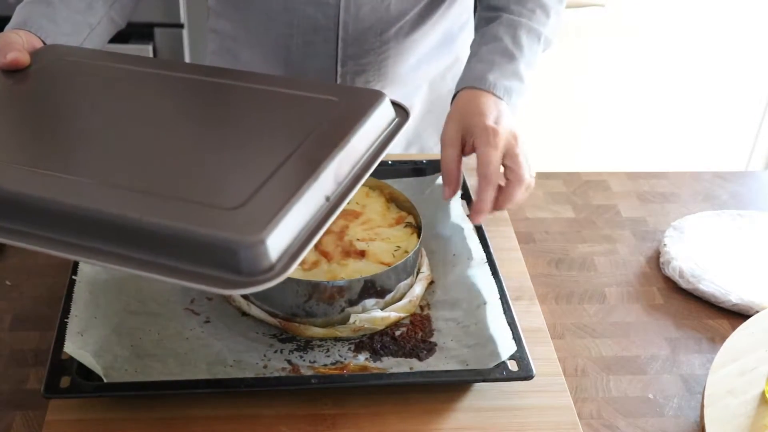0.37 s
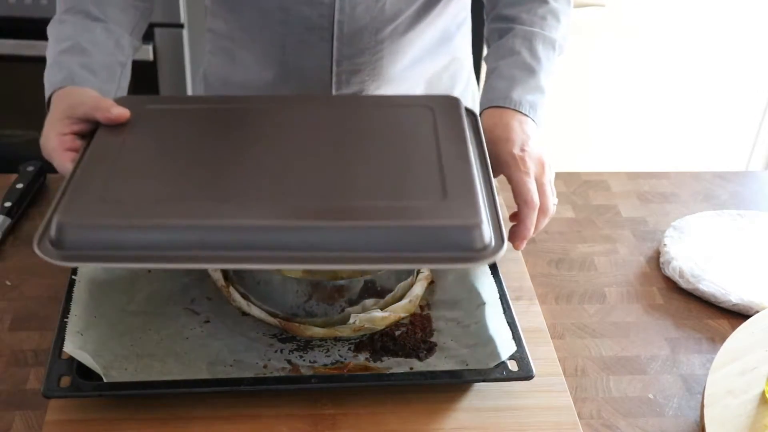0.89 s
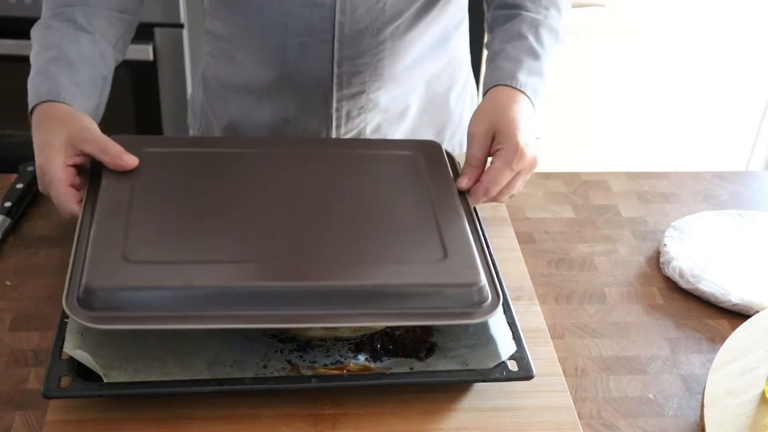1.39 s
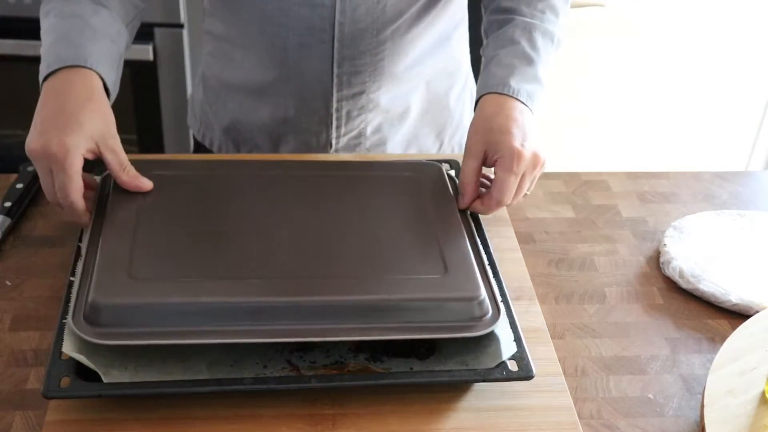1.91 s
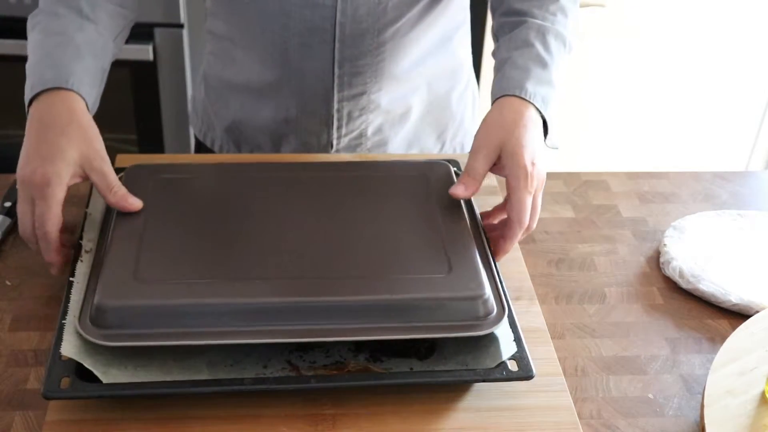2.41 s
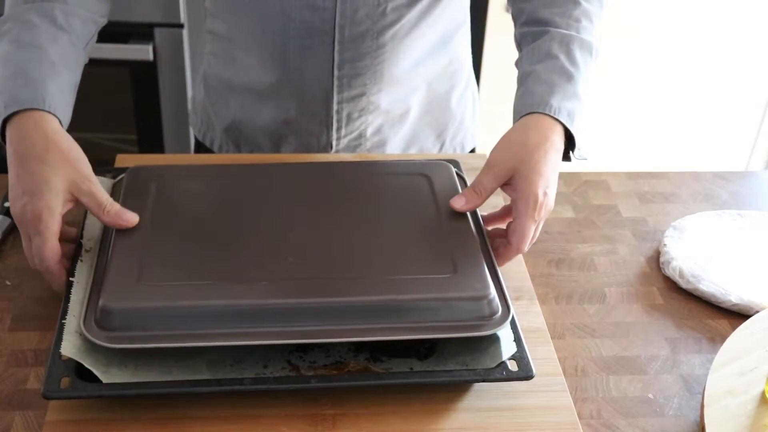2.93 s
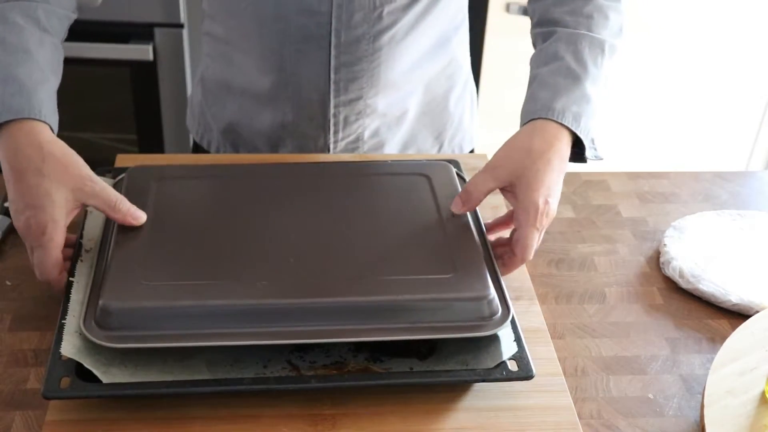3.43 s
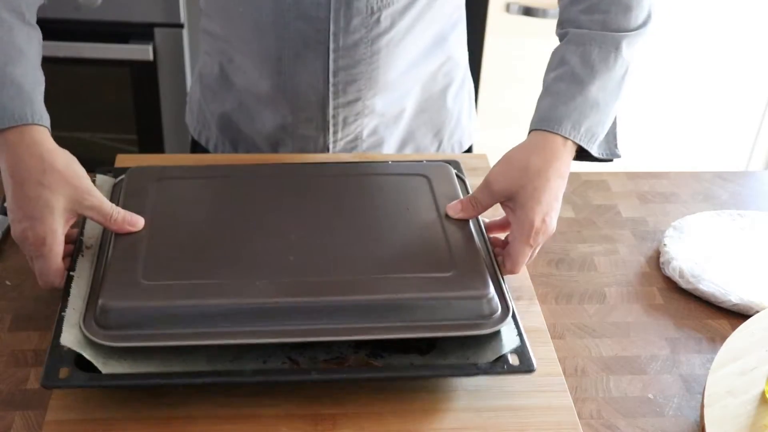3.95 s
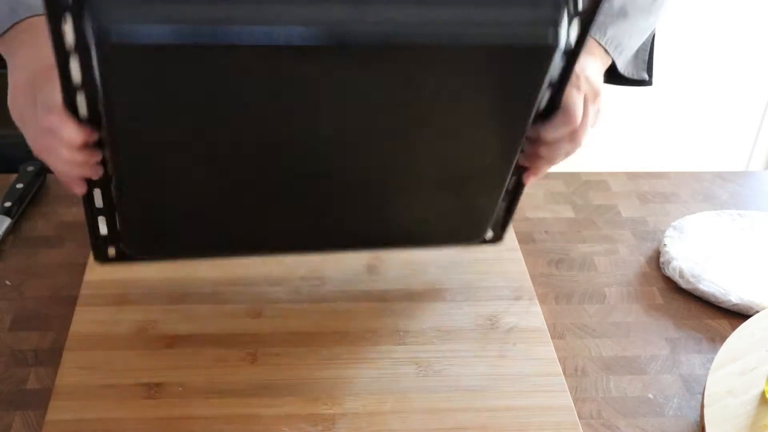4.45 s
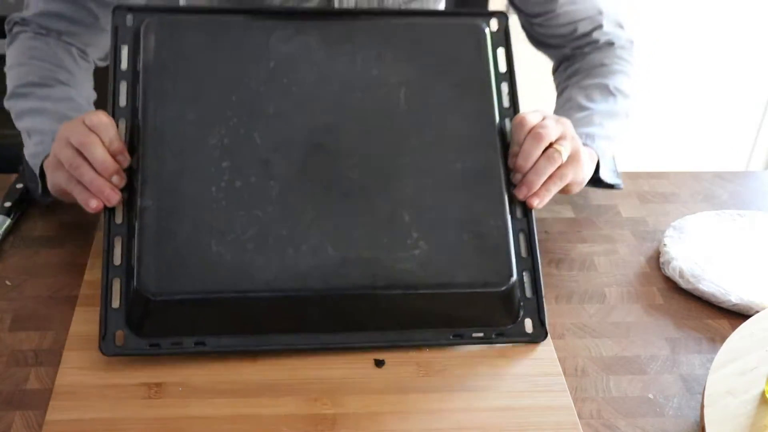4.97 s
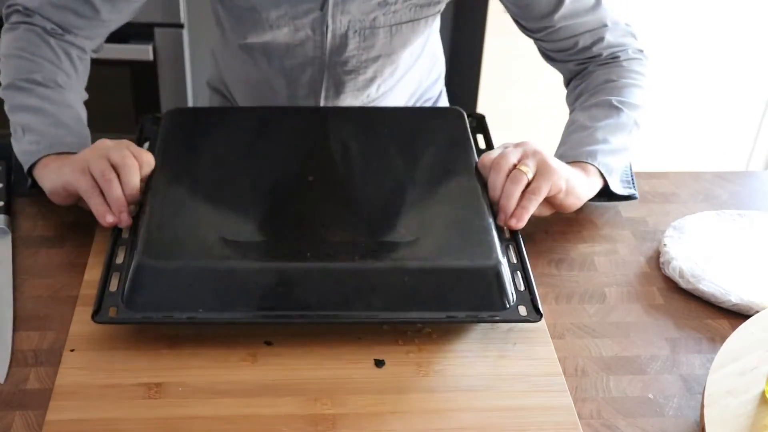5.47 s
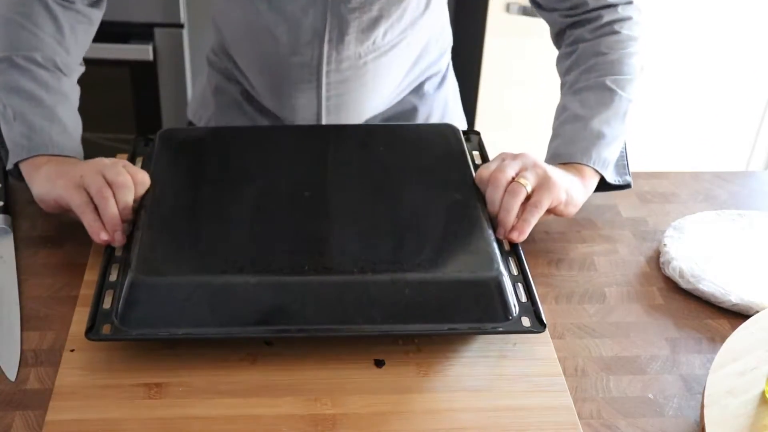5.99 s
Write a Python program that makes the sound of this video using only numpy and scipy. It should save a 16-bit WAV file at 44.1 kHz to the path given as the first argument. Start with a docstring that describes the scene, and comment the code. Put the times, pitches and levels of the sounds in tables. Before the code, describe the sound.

Parchment paper crackles, thin metal trays knock and scrape together, then a loud metallic bang lands on a wooden board with steel ring ticks.

```python
"""In a small kitchen, a cook lays a baking tray upside down over another, grips both, flips them
and sets them on a wooden board. Trays, steel cake ring and board sound as groups of dying sine tones;
knocks and ring ticks add shaped noise. Parchment snaps are short noise bursts; rubbing and rustling are
random tiny slips. Echoes made of fading noise, quiet air and a faint hiss surround it, nearly in mono."""
import sys
import numpy as np
from scipy import signal
from scipy.fft import rfft, irfft
from scipy.io import wavfile
from scipy.ndimage import uniform_filter1d

SR = 44100
rng = np.random.default_rng(int(sys.argv[2]) if len(sys.argv) > 2 else 0)


def pcm_store(signal):
    """Save signal as 16-bit PCM."""
    levels = np.round(np.clip(np.atleast_2d(signal), -1, 1) * 32767)
    wavfile.write(sys.argv[1], SR, levels.astype(np.int16).T)


def undo_db(level):
    """Turn decibels back into plain size, where 20 dB means ten times bigger."""
    steps = np.asarray(level, float) / 20
    return 10 ** steps


N = 269892
T = np.arange(N) / SR  # time in s

# tones of the thin upper tray: pitch_hz [Hz], level_db [dB], t60_s [s to fall 60 dB]
THIN_TRAY = [(297, 3, 0.43), (365.3, 5, 0.59), (490, 9, 0.46), (656.4, 7.5, 0.76), (741, -2, 1),
             (876, 6, 0.34), (1000, 0, 0.48), (1145, 12, 0.31), (1370, -3, 0.46), (1446, 16.5, 0.44),
             (1550, -5, 0.25), (1910, -28, .2), (2243, 16.5, 0.1), (2640, -13, .2), (3030, -6, 0.15),
             (3360, -2, 0.36)]
# tone colour of rustling paper, also used for the ring's ticks: pitch_hz [Hz], level_db [dB per Hz]
RUSTLE = [(880, -44.5), (1500, -4.5), (3410, -1.5), (3960, -4.5), (5490, -2.5), (7760, -10), (13800, -15.5),
          (16000, -16)]
STRIKE_TURNS = 0.08  # phase spread of struck tones, in turns: a blow starts them almost together


def fade(t, t60):
    """Exponential decay, 60 dB down after t60 seconds (never shorter than 2 ms)."""
    return np.exp(-np.log(1000) * t / np.maximum(t60, 0.002))


def level(x, db):
    """Scale to an rms level."""
    return x * undo_db(db) / np.sqrt(np.mean(x ** 2))


def shape(x, gain_db):
    """Causal filter whose dB gain is a function of frequency (minimum phase by the cepstrum)."""
    hz = np.maximum(np.fft.rfftfreq(2048, 1 / SR), 10)
    cepstrum = irfft(gain_db(hz) * np.log(10) / 20)
    # fold the backward half onto the forward half, so that nothing sounds early
    cepstrum[1:1024] *= 2
    cepstrum[1025:] = 0
    response = irfft(np.exp(rfft(cepstrum)))
    return signal.fftconvolve(x, response)[:len(x)]


def points(table):
    """Turn a (Hz, dB) table into a gain function."""
    hz, db = np.transpose(table)
    return lambda f: np.interp(np.log(f), np.log(hz), db)


def add(out, s, sound, peak_db):
    """Mix a sound in at time s with the given peak."""
    i = int(s * SR)
    scaled = sound * undo_db(peak_db) / np.abs(sound).max()
    out[i:i + len(sound)] += scaled[:N - i]


def ringing(modes, t, weight_db, detune, scatter_db, count=2, phase_turns=1):
    """Decaying sines in close, beating groups; each blow lands elsewhere, so strengths and phases change."""
    hz, db, t60 = np.repeat(np.transpose(modes), count, axis=1)[:, :, None]
    chance = rng.standard_normal((3, len(hz), 1))
    cycles = hz * (1 + detune * chance[0]) * t + phase_turns * chance[1]
    strength = undo_db(db + weight_db(hz) + scatter_db * chance[2])
    return (strength * np.sin(2 * np.pi * cycles) * fade(t, t60)).sum(axis=0)


def grit(rate, spread_db, patchy_db):
    """Slips of unequal size, the largest capped, coming in patches of about 25 ms; rms 1."""
    size_db = spread_db * np.minimum(rng.exponential(size=N), 4)
    sizes = undo_db(size_db) * rng.standard_normal(N)
    patches = np.repeat(rng.standard_normal(N // 1000 + 1), 1000)
    patches = uniform_filter1d(patches, 500)[:N]
    slipping = rng.random(N) < rate / SR  # rate is in slips per second
    return level(sizes * undo_db(patchy_db * patches) * slipping, 0)


def strokes(table, rise_db_s, fall_db_s):
    """Gain over time: each stroke swells, holds its level and dies away; powers add."""
    start, length, db = np.transpose(table)[:, :, None]
    t = T[::64]
    rise_db = rise_db_s * np.maximum(start - t, 0)
    fall_db = fall_db_s * np.maximum(t - start - length, 0)
    gain = undo_db(db - rise_db - fall_db)
    return np.interp(T, t, np.sqrt((gain ** 2).sum(axis=0)))


def knocks():
    """A short rattle of contacts drives the tray's modes and a dense clatter; each knock has its own brightness."""
    # tray knocks: start_s [s], peak_db [dB], centre_hz [Hz], treble_lift_db [dB],
    # rattle_s [s, scales how long the knock's parts last]
    knock_table = [(1.461, -49, 500, -12, 0.028), (1.688, -16.5, 806, 10, 0.029),
                   (1.739, -25.5, 764, -8, 0.034), (1.99, -33, 1100, -14, 0.012),
                   (2.088, -22.5, 795, -2.5, 0.048), (2.129, -35, 680, -9, 0.011),
                   (2.502, -45, 720, -1, 0.02), (2.614, -27.5, 850, -4, 0.029),
                   (3.075, -39, 820, -10, 0.019), (3.102, -29.5, 840, 5, 0.049),
                   (3.288, -44, 960, 6, 0.019), (3.471, -45, 1470, -18, 0.056),
                   (3.662, -41.5, 570, 4, 0.028), (3.712, -30.5, 880, 5, 0.033),
                   (3.872, -41.5, 890, -1, 0.046), (4.073, -20, 650, 5.5, 0.0092),
                   (4.086, -21, 397, 2.5, 0.013), (4.118, -28.5, 480, -28, 0.025),
                   (4.898, -36, 659, 23, 0.0077), (5.085, -13.5, 400, 9.5, 0.011),
                   (5.136, -26.5, 715, 8.5, 0.022), (5.23, -24, 475, -23, 0.022),
                   (5.26, -25, 1740, -22, 0.0075), (5.271, -3.5, 1650, -7.5, 0.0048),
                   (5.282, -12.5, 670, 1, 0.0072), (5.294, -11.5, 890, 1, 0.011),
                   (5.311, -17, 1070, -14, 0.025), (5.335, -20.5, 490, -16, 0.063),
                   (5.39, -27, 900, -20, 0.011), (5.42, -20, 674, -10, 0.026),
                   (5.454, -19.5, 1000, -8.5, 0.026), (5.48, -23, 530, -21, 0.017),
                   (5.53, -33, 700, -15, 0.01), (5.654, -28, 1500, -2.5, 0.013),
                   (6.079, -42, 490, 3, 0.014)]
    # tones of the heavy lower tray: pitch_hz [Hz], level_db [dB], t60_s [s]
    heavy_tray = [(285, 0, 0.38), (344, -4, 0.29), (500, 9, 1), (564, 5.5, 0.29), (637, 1.5, 0.37),
                  (754, 2, 0.23), (834, -8, 0.28), (987, 9, 0.36), (1065, 2, 0.4), (1180, 1, 0.22),
                  (1280, -4, 0.45), (1357, 3, 0.11), (1494, 9.5, 0.14), (1650, 0, 0.2), (1670, -1, 0.3),
                  (2300, -2, 0.21)]
    # tone colour of the clatter: pitch_hz [Hz], level_db [dB per Hz]
    clatter_colour = [(120, -25), (200, -6.5), (647, 1), (1180, -1), (1500, -5.5), (1680, -2), (3070, -5.5),
                      (13800, -42.5), (16000, -70)]
    lift_s = 4.0  # until the lift only the thin upper tray is struck
    thin_hz, thin_db_oct = 266, 14  # the thin tray has no bass: loss in dB per octave below this pitch
    first_share = 1.2  # strength of the first contact against the rest of the rattle

    out, t = np.zeros(N), T[:15000]
    # a sheet sends out little below its lowest mode
    edge = signal.butter(3, 240, "high", fs=SR, output="sos")
    for s, db, hz, lift_db, rattle in knock_table:
        def weight_db(f):
            hump_db = 9 * np.exp(-(np.log2(f / hz) / 0.55) ** 2)
            treble_db = lift_db * np.clip(np.log2(f / 1200) / 1.73, 0, 1)
            bass_loss_db = (s < lift_s) * thin_db_oct * np.maximum(np.log2(thin_hz / f), 0)
            return hump_db + treble_db - bass_loss_db

        contacts = rng.standard_normal(2500) ** 3 * fade(t[:2500], 3 * rattle)
        # the first contact sets all modes off together
        contacts[0] = first_share * np.sqrt(np.sum(contacts ** 2))
        tray = THIN_TRAY if s < lift_s else heavy_tray
        tones = ringing(tray, t, weight_db, 0.012, 1.7, count=3, phase_turns=STRIKE_TURNS)
        # a firm grip stops the rattle early and damps every mode
        tones = tones * fade(t, 25 * rattle)
        modes = signal.fftconvolve(tones, contacts)[:len(t)]

        build_up = 1 - fade(t, 0.19 * rattle)
        die_away = fade(t, 6 * rattle) + 0.44 * fade(t, 0.24)
        noise = rng.standard_normal(len(t)) * build_up * die_away
        # the first touch cracks, the harder the blow the more
        noise[30] = 15 * undo_db(0.12 * (db + 3))
        clatter = shape(noise, lambda f: points(clatter_colour)(f) + weight_db(f))
        add(out, s, level(signal.sosfilt(edge, modes), -7) + level(clatter, 0), db)
    return out


def cake_ring():
    """Hard steel ticks: the modes flash for a few ms, then ring on quietly under a jangle; soft ones are dull."""
    # cake ring bouncing on the tray: start_s [s], peak_db [dB]
    bounce_table = [(5.2899, -14.5), (5.298, -22), (5.3626, -13.5), (5.373, -31), (5.4176, -13.5),
                    (5.426, -28), (5.449, -21.5), (5.4744, -22.5), (5.49, -28)]
    # tones of the steel cake ring: pitch_hz [Hz], level_db [dB], t60_s [s]
    ring_modes = [(3450, -2, .05), (4340, -6, .04), (5430, 1, .09), (6400, -12, .04), (7680, -14, .06),
                  (8390, -18, .05), (8840, -17, .06), (9820, -10, .06), (11350, -16, .07),
                  (12570, -16, .07), (14130, -14, .06)]
    soft_dull = 0.6  # dB of treble lost per dB that a bounce is softer than the hardest

    out, t = np.zeros(N), T[:5000]
    hardest_db = max(db for s, db in bounce_table)
    for s, db in bounce_table:
        def dull_db(f):
            return soft_dull * (db - hardest_db) * np.clip(np.log2(f / 6000) / 0.5, 0, 1)

        tick = rng.standard_normal(len(t)) * (fade(t, 0.018) + 0.14 * fade(t, 0.2))
        tick = shape(tick, lambda f: points(RUSTLE)(f) + dull_db(f))
        rings = ringing(ring_modes, t, dull_db, 0.004, 1.5, count=3, phase_turns=STRIKE_TURNS)
        rings = rings * (fade(t, 0.025) + 0.25)  # flash, then quiet ringing
        add(out, s, level(rings, 0) + level(tick, -4), db)
    return out


def thuds():
    """Weight lands on the board; the heavy wood takes a few cycles to get going."""
    # landings: start_s [s], peak_db [dB]
    thud_table = [(3.561, -52), (4.075, -32.5), (5.086, -30), (5.232, -37.5), (5.31, -29.5), (5.35, -35),
                  (5.447, -36), (5.664, -43), ]
    # tones of the board under the trays: pitch_hz [Hz], level_db [dB], t60_s [s]
    board_modes = [(69.3, -19.5, 0.6), (156.5, -8.5, 0.11), (184, -6, 0.12), (249, 9, 0.046),
                   (287, 2, 0.13)]
    out, t = np.zeros(N), T[:15000]
    for s, db in thud_table:
        wood = ringing(board_modes, t, np.zeros_like, 0.038, 2.0)
        add(out, s, wood * (1 - fade(t, 0.048)), db)
    return out


def crease(lift_db):
    """The fold creaks, then snaps: a few ms of noise, leaning by chance toward one of two resonant pitches."""
    # tone colour of snapping paper: pitch_hz [Hz], level_db [dB per Hz]
    paper_colour = [(410, -61), (700, -20.5), (1460, -6), (1890, -10.5), (2660, -6), (3280, -3), (3890, -6),
                    (5190, 1.5), (7200, -23.5), (12600, -25.5), (16000, -38.5)]
    # two resonant pitches, as of the microphone [Hz]
    resonances_hz = (3340, 5940)
    t = T[:2500] - 0.003  # the snap comes at 0
    hz = resonances_hz[rng.integers(2)]

    def colour_db(f):
        octaves = np.log2(f / hz)
        lean_db = 3 * np.exp(-(octaves / 0.25) ** 2) + 5 * np.exp(-(octaves / 0.06) ** 2)
        treble_db = lift_db * np.clip(np.log2(f / 5500) / 0.5, 0, 1)
        return points(paper_colour)(f) + lean_db + treble_db

    creak = 0.5 * fade(-t, 0.0033)
    snap = np.where(t < 0, creak, fade(t, 0.013) + fade(t, 0.002))
    tail = 0.23 * fade(t, 0.14) * (t > 0)
    return shape(rng.standard_normal(len(t)) * (snap + tail), colour_db)


def drag_gain():
    """Loudness over time of paper dragged under the hands."""
    # drags: start_s [s], length_s [s], level_db [dB]
    drag_table = [(0.1, 0.23, -55.5), (0.64, 0.1, -50), (1.045, 0.0066, -48), (1.42, 0.17, -56.5),
                  (1.925, 0.085, -44.5), (2.06, 0.079, -54), (2.27, 0.066, -53.5), (2.86, 0.13, -69),
                  (3.5, 0.0092, -62), (4.03, 0.18, -65.5), (4.85, 0.46, -65.5), (5.36, 0.11, -42.5),
                  (5.5, 0.33, -60.5)]
    return strokes(drag_table, rise_db_s=228, fall_db_s=164)


def creases():
    """The louder snaps, and small ones at chance moments whose loudness follows the dragging of the paper."""
    # the louder parchment creases: snap_s [s], peak_db [dB], treble_lift_db [dB]
    crease_table = [(0.0034, -19, 13.5), (0.0278, -30, 18), (0.0643, -25, 13), (0.098, -35, 4),
                    (0.1463, -30, 16), (0.205, -22.5, 14), (0.2198, -27, 12), (0.2274, -29, 9),
                    (0.245, -25.5, 12), (0.2712, -22, 15), (0.515, -41.5, 4), (0.574, -30.5, 9),
                    (0.591, -26, 16), (0.5967, -21.5, 16), (0.6027, -20, 2), (0.615, -33, -1),
                    (0.6314, -23, 13.5), (0.6623, -35, 1), (0.6972, -25, 8.5), (0.7421, -25, 8),
                    (0.7538, -27.5, -16), (0.9357, -28.5, 13), (0.9545, -24, 11.5), (0.9955, -22.5, 17),
                    (1.019, -28.5, -10), (1.052, -23.5, 11), (1.0733, -27, 3), (1.3295, -41, -23),
                    (1.48, -34, 20), (1.5961, -32, 12), (1.627, -33, 15), (1.679, -31, 22),
                    (1.8114, -30.5, 13.5), (1.831, -36.5, 14), (1.856, -39, 9), (1.908, -31, 22),
                    (1.928, -23.5, 16), (1.945, -26, -1), (1.9557, -20, 18), (1.991, -23, 16.5),
                    (2.002, -24, 14), (2.19, -32.5, 20), (2.271, -46, 13), (2.3214, -30.5, 20),
                    (2.355, -40, 25), (2.5037, -32.5, 13), (2.6348, -35, 14), (3.0778, -30, 9.5),
                    (3.223, -42, 10), (3.2882, -35, 10), (3.3322, -34.5, 16), (3.5177, -35.5, 14.5),
                    (3.652, -39, 9), (3.845, -44, -1), (3.873, -33.5, 6), (3.899, -32.5, 13),
                    (4.0845, -23, 12), (4.092, -25.5, 13), (4.101, -36, 15), (4.12, -28.5, 16),
                    (4.183, -39.5, -1), (4.631, -37, 13.5), (4.8982, -37, 20), (5.61, -35, -7),
                    (5.624, -37, 30), (5.643, -32, 13), (5.7008, -31.5, 20), (5.915, -32.5, 9),
                    (6.1124, -40.5, 14)]
    crackles_per_s, crackle_lift_db = 75, 5  # small creases and their treble lift
    crackle_db, scatter_db = 3, 2  # their peak over the drag level, and its spread

    out = np.zeros(N)
    for s, db, lift_db in crease_table:
        add(out, s - 0.003, crease(lift_db), db)  # the creak comes 3 ms ahead
    drag = drag_gain()
    chance = rng.standard_normal(500)
    times = np.cumsum(rng.exponential(size=500)) / crackles_per_s
    kinds = [crease(crackle_lift_db) for _ in range(24)]
    for k in np.flatnonzero(times < T[-1]):
        drag_db = 20 * np.log10(drag[int(times[k] * SR)])
        peak_db = drag_db + crackle_db + scatter_db * chance[k]
        add(out, times[k], kinds[k % len(kinds)], peak_db)
    return out


def slides():
    """Stick-slip grit in the tray's body, and fine rustle of the paper."""
    # rims sliding on a tray: start_s [s], length_s [s], level_db [dB]
    rub_table = [(0.0, 0.086, -57.5), (1.05, 0.019, -59.5), (0.62, 0.098, -62), (1.33, 0.49, -62.5),
                 (1.7, 0.068, -44.5), (1.91, 0.19, -44.5), (2.16, 0.21, -55), (2.59, 0.033, -49),
                 (3.63, 0.044, -56), (4.85, 0.31, -62.5), (5.37, 0.079, -64), (5.56, 0.24, -52.5)]
    # tone colour of the scraping: pitch_hz [Hz], level_db [dB per Hz]
    scrape_colour = [(88, -34), (150, -22.5), (532, 4), (1240, 1.5), (1480, -0.5), (1920, -4.5),
                     (5560, -5.5), (8170, -39), (12000, -20), (15600, -52), (22000, -120)]
    slips = shape(grit(5000, 3.2, 3.5), points(scrape_colour))
    t = T[:4000]
    body = ringing(THIN_TRAY, t, np.zeros_like, 0.02, 3) * fade(t, 0.035)
    in_body = signal.fftconvolve(slips, body)[:N]
    scrape = level(level(slips, 0) + level(in_body, -5), 0)
    rustle = level(shape(grit(6000, 3, 4), points(RUSTLE)), 0)
    return scrape * strokes(rub_table, rise_db_s=206, fall_db_s=159) + rustle * drag_gain()


def squeals():
    """Friction keeps one rim resonance going, unsteadily, and lets it die away."""
    # faintly singing rims: start_s [s], end_s [s], pitch_hz [Hz], level_db [dB rms before the fades]
    squeal_table = [(1.323, 1.381, 3120, -52), (2.845, 3.008, 5070, -69), (4.487, 5.03, 2544, -67),
                    (4.62, 4.854, 5070, -68), (5.72, 5.91, 1455, -57)]
    out, slips = np.zeros(N), grit(6000, 2, 2.5)
    for start, end, hz, db in squeal_table:
        i, count = int(start * SR), int((end - start) * SR)
        band = signal.butter(1, [hz / 1.028, hz * 1.028], "band", fs=SR, output="sos")
        tone = level(signal.sosfilt(band, slips[i:i + count]), db)
        weakening = 1 - 0.5 * T[:count] / T[count]
        out[i:i + count] += tone * signal.windows.tukey(count, 0.4) * weakening
    return out


def kitchen(x):
    """Diffuse echoes: noise that builds up very quickly and then dies, sooner in most of the treble."""
    # echo decay in each band: centre_hz [Hz], t60_s [s]
    echo_table = [(125, 0.42), (300, 0.57), (700, 0.5), (1500, 0.53), (3000, 0.4), (6000, 0.039),
                  (12000, 0.17)]
    t, tail = T[:40000], 0
    for hz, t60 in echo_table:
        band = signal.butter(2, [hz / 1.5, min(hz * 1.5, 20000)], "band", fs=SR, output="sos")
        tail = tail + signal.sosfilt(band, rng.standard_normal(len(t))) * fade(t, t60)
    tail = tail * (1 - np.exp(-t / 0.0005))
    tail = undo_db(-8.5) * tail / np.sqrt(np.sum(tail ** 2))  # echo energy in dB against the direct sound
    return signal.fftconvolve(x, tail)[:N]


def room_air():
    """Steady quiet air: noise coloured by a table, strongest in the bass."""
    # tone colour of the air: pitch_hz [Hz], level_db [dB per Hz]
    air_colour = [(12, -69), (20, 7.5), (65, -8.5), (258, -5.5), (332, -9.5), (372, -10), (404, -6.5),
                  (690, -10.5), (888, -10.5), (1950, -14), (14300, -31.5), (16500, -35)]
    return level(shape(rng.standard_normal(N), points(air_colour)), -60)


def side_hiss():
    """Faint coloured noise for the difference between the two channels."""
    # tone colour of the hiss: pitch_hz [Hz], level_db [dB per Hz]
    hiss_colour = [(12, -28), (20, 4), (160, -8), (2660, -16), (5360, -13), (13600, -15), (15200, -16),
                   (16500, -37)]
    return level(shape(rng.standard_normal(N), points(hiss_colour)), -73)


def scene():
    """All sources reach both channels alike; only a faint hiss differs."""
    near = knocks() + cake_ring() + thuds() + creases() + slides() + squeals()
    mid = near + kitchen(near) + room_air()
    side = side_hiss()
    return np.array([mid + side, mid - side])


def band_limit(x):
    """A steep low-pass at the top of the band."""
    return signal.sosfilt(signal.butter(12, 16680, fs=SR, output="sos"), x)


def record(dry):
    """The small microphone loses the deep bass, below 60 Hz."""
    low_cut = signal.butter(2, 60, "high", fs=SR, output="sos")
    heard = signal.sosfilt(low_cut, dry)
    return band_limit(heard)


dry = scene()
out = record(dry)
pcm_store(out)
```